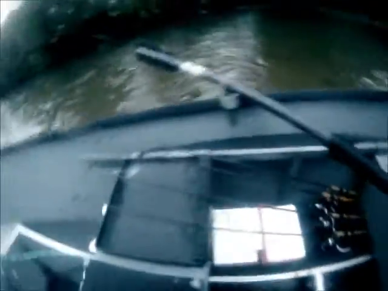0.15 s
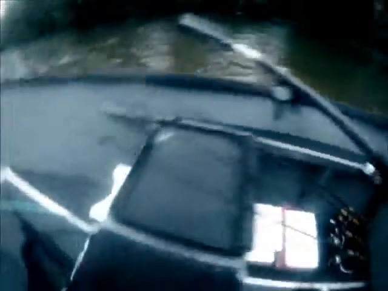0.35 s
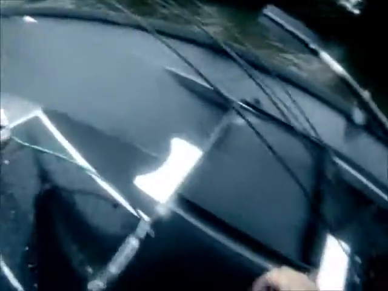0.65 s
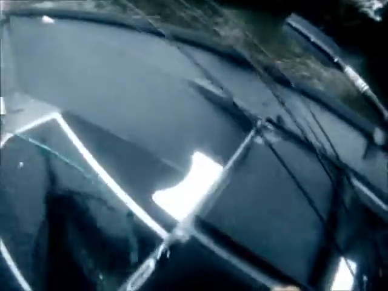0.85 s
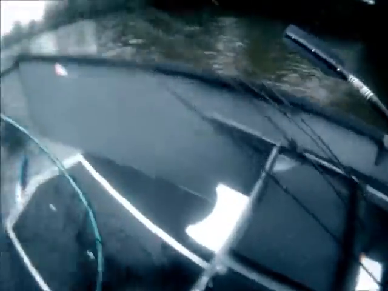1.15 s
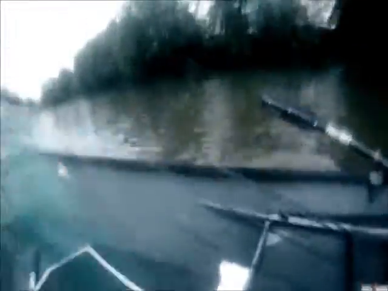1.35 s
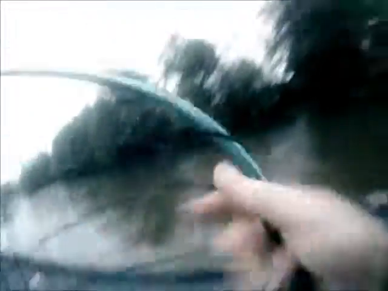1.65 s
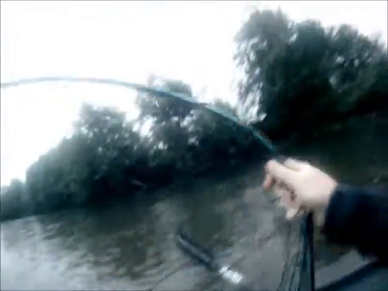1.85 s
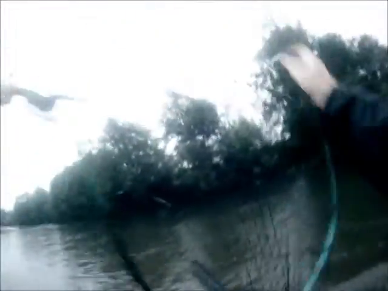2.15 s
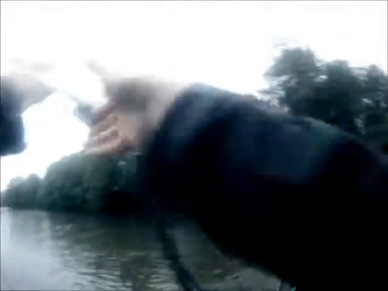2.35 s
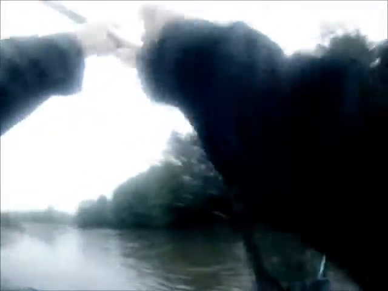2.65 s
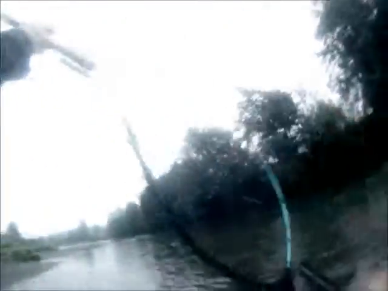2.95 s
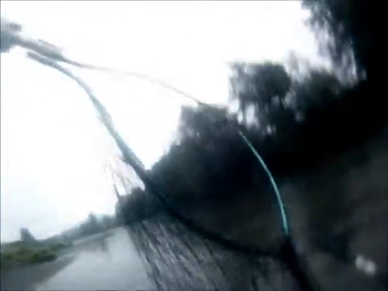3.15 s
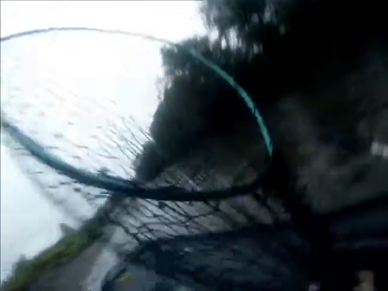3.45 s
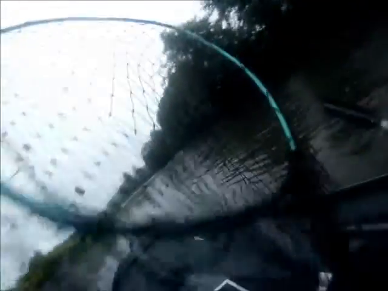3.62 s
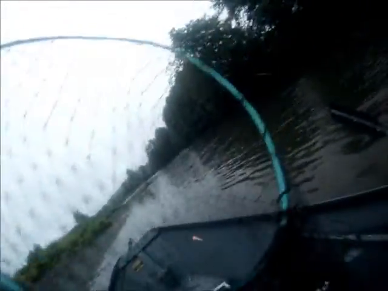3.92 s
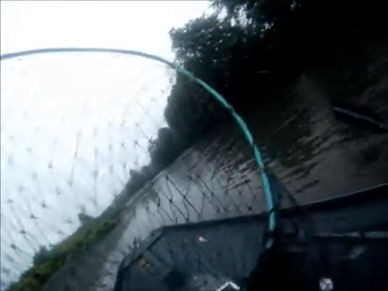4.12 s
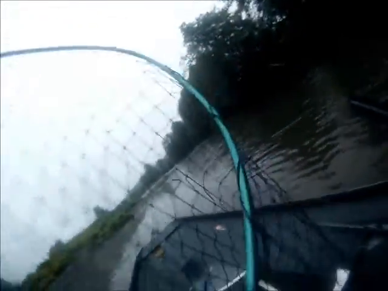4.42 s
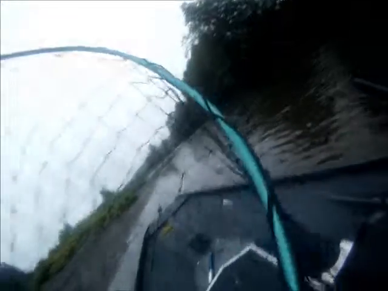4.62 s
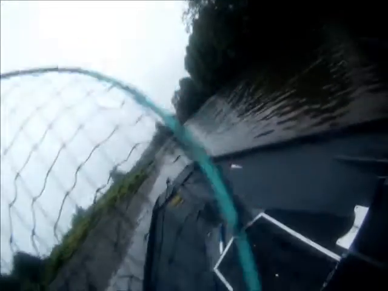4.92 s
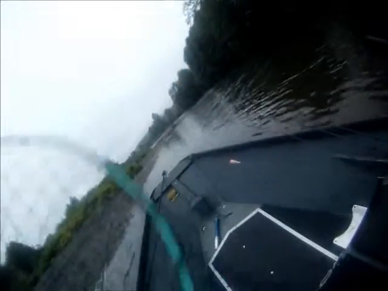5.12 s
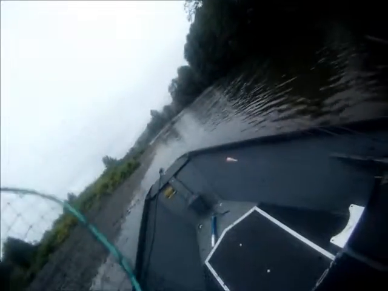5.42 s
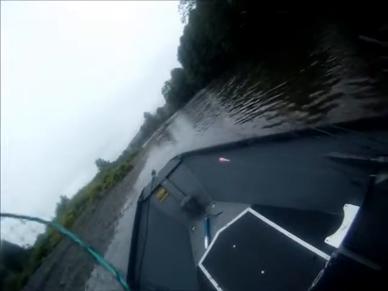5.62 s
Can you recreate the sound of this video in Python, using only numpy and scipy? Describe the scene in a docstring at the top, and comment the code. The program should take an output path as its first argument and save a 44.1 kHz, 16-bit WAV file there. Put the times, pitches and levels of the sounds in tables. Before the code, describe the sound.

Jacket cloth rubs against a body-worn microphone on a small river boat, with one hard knock, net ticks and quiet lapping water.

```python
"""On a small boat drifting down a river, microphone inside the case of a body-worn camera.
From the start water washes along the hull and a jacket rubs over the case in uneven swells.
Near 1 s a wavelet breaks and a landing net is lifted, gear ticking; at 1.5 s a hard knock overloads
the microphone. After 3 s the rubbing eases, a few plops follow, and near the end a bird calls far off.
Throughout, the recorder holds each sample at a low rate, mirroring the sound into a thin treble sheen."""
import sys
import numpy as np
from scipy import signal
from scipy.fft import rfft, irfft
from scipy.io import wavfile

SR = 44100
rng = np.random.default_rng(int(sys.argv[2]) if len(sys.argv) > 2 else 0)


def store_wav(level_fs):
    """Save 16-bit WAV to argv[1]."""
    pcm = np.round(np.clip(np.atleast_2d(level_fs), -1, 1) * 32767)
    wavfile.write(sys.argv[1], SR, pcm.T.astype(np.int16))


N = 254898
TIME = np.arange(N) / SR


def jacket_rub(rustle_db=4.5, ring_db=-4.5, rumble_db=-0.5, flutter_db=1.4, catch_db=2.5, jostle_db=2.15):
    """Cloth sticks and slips right at the microphone: it rustles, rings the case and jostles it."""
    # Spectrum of the sliding cloth. Each row: frequency in Hz, relative level in dB.
    rustle_spectrum = [(220, -45), (380, -20), (456, -25), (635, -11), (844, -17), (957, -9.5), (1120, -6),
                       (1650, -14.5), (1940, -3), (2200, -7.5), (2960, -15.5), (3430, -11.5), (4070, -28),
                       (4720, -29), (5800, -30), (7540, -60.5), (12800, -120)]
    # Spectrum of the case being pushed about. Each row: frequency in Hz, relative level in dB.
    rumble_spectrum = [(12, -32), (20, -1), (49, -6), (113, 1.5), (161, -8), (271, -7.5), (325, -18.5),
                       (405, -29), (450, -27.5), (580, -59.5), (990, -120)]
    rustle_gain, ring_gain, rumble_gain = jacket_strokes()
    pressure_db = flutter_db * drift(35)
    slips = rng.standard_normal(N) * from_db(-0.5 * drift(400))  # fine grain
    rustle = colour(slips, rustle_spectrum)
    shell = rms_one(band(rng.standard_normal(N), 1843, 2281, order=3))
    # the shell sings in short spurts whenever the cloth catches
    spurts = rms_one(from_db(pressure_db + catch_db * drift(25)))
    rumble = colour(rng.standard_normal(N), rumble_spectrum)
    jostle = rms_one(from_db(jostle_db * drift(14)))
    return (from_db(rustle_db + pressure_db) * rustle_gain * rustle
            + from_db(ring_db) * ring_gain * shell * spurts
            + from_db(rumble_db + pressure_db) * rumble_gain * rumble * jostle)


def jacket_strokes(drop_db=9, roundness=1.38):
    """Gains of rustle, ring and rumble: each stroke swells and dies away, and overlaps add in power."""
    # Strokes over the case. Each row: crest in seconds, relative level in dB, rise and fall in seconds
    # (each spans drop_db), offsets of the ring and of the rumble in dB.
    strokes = [(0.012, -51, 0.016, 0.041, -11, 0), (0.225, -47.5, .11, 0.056, -11, 0),
               (0.365, -52, 0.02, 0.033, -12, -11), (0.48, -46.5, 0.099, 0.27, 8, 7),
               (0.661, -43.5, 0.054, 0.057, 8, 6), (0.798, -47.5, 0.059, 0.051, 3, 4),
               (0.931, -43, 0.021, 0.028, 6, 6), (1.046, -48, 0.26, 0.051, -1, 9.5),
               (1.18, -46.5, 0.11, 0.029, 7, 7), (1.445, -43, .2, 0.029, 9, 3.5),
               (1.652, -44, 0.054, 0.043, 5.5, 1.5), (1.876, -42, 0.092, 0.024, 6, 0.5),
               (2.1, -48.5, 0.29, 0.37, 7.5, 2), (2.225, -40, 0.034, 0.022, 12.5, -1),
               (2.526, -34, 0.053, 0.07, 9.5, -2), (2.66, -46, 0.27, 0.12, 8.5, 3.5),
               (2.886, -40, 0.061, .03, 9, 9), (2.964, -32, 0.072, 0.044, 5, 0),
               (3.023, -38.5, 0.044, 0.0065, 12, 4), (3.075, -48, 0.029, 0.16, 11, 2.5),
               (3.279, -46, 0.021, 0.017, 9, -4.5), (3.41, -55.5, 0.085, 0.037, 17, 6.5),
               (3.546, -50.5, .1, 0.11, 10, 8), (3.812, -55.5, 0.085, 0.11, 3, -2),
               (4.04, -53.5, 0.044, 0.044, 9.5, -7.5), (4.179, -54.5, 0.027, 0.022, 9, 4.5),
               (4.256, -53.5, 0.034, 0.027, 6.5, 3.5), (4.408, -54.5, 0.055, 0.062, 6, 1.5),
               (4.529, -55, 0.036, .072, 9, 4), (4.665, -54, 0.088, 0.019, 10, 0.5),
               (4.86, -57, 0.34, 0.029, 2, 6), (4.96, -56, 0.038, 0.045, 6.5, 7.5),
               (5.035, -54.5, 0.035, 0.065, 15.5, 6.5), (5.16, -61, 0.056, 0.19, 7.5, 4.5),
               (5.564, -55, 0.081, 0.12, 1.5, 1.5), (5.76, -59, 0.036, 0.031, 8, 0)]
    t, power = TIME[::40], 0
    for crest, db, rise_s, fall_s, ring_db, rumble_db in strokes:
        from_crest = np.abs((t - crest) / np.where(t < crest, rise_s, fall_s))
        level_db = db - drop_db * from_crest ** roundness  # roundness 1 is pointed, 2 a bell
        power = power + from_db(level_db + np.array([[0], [ring_db], [rumble_db]])) ** 2
    return [np.interp(TIME, t, np.sqrt(layer)) for layer in power]


def knock(start=1.468, contact_s=0.0015, judder_s=0.0083, stop_s=0.00065, crack_db=-20, hull_db=-41):
    """A hard hit on the case: a shove, a judder cut off as contact ends, a crack, a faint hull note."""
    # Flexing of the case and its mount. Each row: frequency in Hz, gain in dB, t60 in seconds.
    flex_modes = [(125, 4, .025), (282, 16.7, .0101), (497, 19.8, .0125), (719, 12.8, .0099),
                  (1140, 13.9, .0225), (1970, 9.1, .064), (2220, 6.7, .078)]
    # Modes of the hull. Each row: frequency in Hz, relative gain in dB, t60 in seconds.
    hull_modes = [(534, -4, 0.3), (730, -7, 0.18), (1082, -20.5, 0.26)]
    t = TIME[:SR // 2]
    blow = signal.unit_impulse(len(t))
    shove = np.minimum(t / contact_s, 1) ** 2
    release = 1 / (1 + np.exp(np.minimum((t - judder_s) / stop_s, 50)))
    crack = peak_one(band(burst(t60=0.035), 900, 4000))
    out = np.zeros(N)
    add(out, start, shove * release * ring(blow, flex_modes))
    add(out, start + judder_s, from_db(crack_db) * crack)
    add(out, start, from_db(hull_db) * ring(blow, hull_modes))
    return out


def case_taps(gain_db=1.5):
    """Light taps ring the plastic case around the microphone."""
    # Taps on the case. Each row: start in seconds, peak in dB before gain_db.
    taps = [(0.3576, -37), (1.0134, -26), (3.0627, -43), (3.4757, -32.5), (3.6987, -30), (3.7954, -35),
            (3.8268, -37), (3.903, -40), (4.1792, -31), (5.021, -28.5)]
    # Modes of the case. Each row: frequency in Hz, relative gain in dB, t60 in seconds.
    case_modes = [(640, -12, 0.043), (1220, -37, 0.012), (1960, 21, 0.028), (2340, 21, 0.012),
                  (2500, -9, 0.02), (3510, -4, 0.03)]
    out = np.zeros(N)
    for start, db in taps:
        tap = peak_one(ring(burst(t60=0.0066), case_modes))
        add(out, start, from_db(db + gain_db) * tap)
    return out


def net_ticks(gain_db=1, lifting_s=(1, 4.2), faint_count=16, faint_db=(-53, -45), faint_t60=0.045):
    """Net and gear tick brightly close by; fainter ticks come at random while the net is lifted."""
    # The distinct ticks. Each row: start in seconds, peak in dB before gain_db, t60 in seconds.
    ticks = [(0.8011, -37.5, 0.033), (0.8919, -37, 0.16), (0.9133, -30, 0.18), (1.1897, -41, .08),
             (1.6801, -39, 0.21), (1.7659, -30, 0.04), (2.1316, -37, 0.043), (2.3441, -33.5, 0.1),
             (2.7077, -33.5, 0.018), (2.8769, -38, 0.068), (3.0659, -36.5, 0.056), (3.1946, -43.5, 0.073),
             (3.4186, -37, 0.032), (3.8272, -38, 0.045)]
    faint = [(rng.uniform(*lifting_s), rng.uniform(*faint_db), faint_t60) for _ in range(faint_count)]
    out = np.zeros(N)
    for start, db, t60 in [*ticks, *faint]:
        tick = peak_one(band(burst(t60), 1830, 5000, order=3))
        add(out, start, from_db(db + gain_db) * tick)
    return out


def gear_bumps(gain_db=-2):
    """Gear bumps close by, each thud one low, dying sine."""
    # Dull bumps. Each row: start in seconds, level in dB before gain_db, pitch in Hz.
    bumps = [(0.471, -26, 109), (0.914, -29, 171), (1.047, -34, 227), (2.272, -30.5, 61),
             (3.029, -29.5, 50), (3.687, -37, 92.8), (4.721, -34.5, 89)]
    out, decay = np.zeros(N), fade(t60=0.16)
    for start, db, hz in bumps:
        thud = decay * np.sin(2 * np.pi * hz * TIME[:len(decay)])
        add(out, start, from_db(db + gain_db) * thud)
    return out


def squeaks():
    """Wet cloth and rubber give short, high squeaks near the microphone."""
    # Squeaks. Each row: start and length in seconds, first and target pitch in Hz, level in dB.
    notes = [(.892, 0.021, 3340, 3060, -38), (.913, 0.018, 3560, 3650, -35),
             (1.012, 0.0054, 3590, 3330, -28.5), (1.0125, 0.015, 2210, 2090, -23),
             (1.019, 0.018, 2090, 2000, -35), (1.19, 0.023, 3760, 3720, -47)]
    return glides(notes, settle_s=0.0081, waver=0.0065)


def splashes(gain_db=-3, spray_db=-4, rise_s=0.0068):
    """Wavelets swell against the side of the boat, slap and break into longer-lasting spray."""
    # Wavelets. Each row: start in seconds, peak in dB before gain_db, t60 of the slap in seconds.
    wavelets = [(0.917, -32.5, 0.085), (0.936, -32.5, 0.075), (4.039, -48, 0.3), (4.843, -35.5, 0.07)]
    out = np.zeros(N)
    for start, db, t60 in wavelets:
        slap = peak_one(band(burst(t60), 230, 490))
        spray = peak_one(band(burst(t60 * 3.1), 1300, 4000))
        swell = 1 - np.exp(-TIME[:len(slap)] / rise_s)
        splash = peak_one(swell * (slap + from_db(spray_db) * spray))
        add(out, start, from_db(db + gain_db) * splash)
    return out


def plops():
    """Water plops beside the hull in short, rising tones."""
    # Plops. Each row: start and length in seconds, first and target pitch in Hz, level in dB.
    notes = [(.358, .025, 1135, 1215, -39), (.925, 0.095, 330, 382, -49.5), (4.797, 0.018, 556, 640, -52),
             (4.798, 0.014, 860, 970, -52), (4.836, 0.016, 360, 448, -50), (4.87, 0.035, 191, 225, -46.5),
             (5.201, 0.0056, 630, 825, -47), (5.25, 0.055, 1250, 1280, -52)]
    return glides(notes, settle_s=0.018, waver=0.049)


def river(level_db=-58.5, lap_db=3.2):
    """The current washes along the hull, a quiet, lapping bed under everything."""
    # Spectrum of the wash. Each row: frequency in Hz, relative level in dB.
    wash_spectrum = [(18, -28.5), (30, -2.5), (128, -10.5), (296, -21), (471, -21.5), (574, -25),
                     (781, -21.5), (853, -32.5), (996, -18), (1650, -31), (2250, -15.5), (2570, -30.5),
                     (3490, -29.5), (4970, -28.5), (5800, -37), (7540, -74), (12800, -120)]
    lapping = from_db(level_db + lap_db * drift(5.5))
    return lapping * colour(rng.standard_normal(N), wash_spectrum)


def far_bird():
    """A bird far from the boat gives three faint, falling notes."""
    # The call. Each row: start and length in seconds, first and target pitch in Hz, level in dB.
    notes = [(5.33, 0.0092, 4820, 4300, -62.5), (5.343, 0.041, 4120, 3840, -58),
             (5.473, 0.039, 3950, 3840, -59)]
    return glides(notes, settle_s=0.012, waver=0.01)


def glides(notes, settle_s, waver):
    """Short, slightly unsteady tones that slide towards a target pitch."""
    out, wobble = np.zeros(N), drift(250)
    for start, length, first_hz, target_hz, db in notes:
        t = TIME[:int(length * SR)]
        hz = target_hz + (first_hz - target_hz) * np.exp(-t / settle_s)
        hz *= 1 + waver * wobble[int(start * SR):][:len(t)]
        arch = np.sin(np.pi * t / length)
        add(out, start, from_db(db) * arch * np.sin(2 * np.pi * np.cumsum(hz) / SR))
    return out


def from_db(db):
    """Decibels to gain."""
    return 10 ** (np.asarray(db) / 20)


def rms_one(x):
    """Scale to rms 1."""
    return x / np.sqrt(np.mean(x ** 2) + 1e-20)


def peak_one(x):
    """Scale to peak 1."""
    return x / (np.abs(x).max() + 1e-12)


def band(x, low_hz, high_hz, order=2):
    """Causal band-pass."""
    sos = signal.butter(order, [low_hz, min(high_hz, .45 * SR)], "band", fs=SR, output="sos")
    return signal.sosfilt(sos, x + 1e-18)


def colour(x, spectrum):
    """Shape x with a spectrum drawn on a log-frequency axis; rms 1."""
    hz, db = np.transpose(spectrum)
    bins = np.maximum(np.fft.rfftfreq(N, 1 / SR), 1)
    gain = from_db(np.interp(np.log(bins), np.log(np.sort(hz)), db))
    return rms_one(irfft(rfft(x) * gain, N))


def drift(rate_hz):
    """Random wander, mostly slower than rate_hz; rms 1."""
    bins = np.fft.rfftfreq(N, 1 / SR)
    return rms_one(irfft(rfft(rng.standard_normal(N)) / (1 + (bins / rate_hz) ** 2), N))


def ring(x, modes):
    """Drive parallel resonators with x; each rings as a damped sine."""
    out = 0
    for hz, db, t60 in modes:
        radius, angle = from_db(-60 / (t60 * SR)), 2 * np.pi * hz / SR
        feedback = [1, -2 * radius * np.cos(angle), radius * radius]
        out = out + from_db(db) * signal.lfilter([0, np.sin(angle)], feedback, x + 1e-18)
    return out


def fade(t60):
    """A third of a second of exponential decay, falling 60 dB in t60 seconds."""
    return np.exp(-np.log(1000) * TIME[:SR // 3] / max(t60, 1e-4))


def burst(t60):
    """A dying spray of tiny contacts."""
    decay = fade(t60)
    return decay * rng.standard_normal(len(decay))


def add(out, start, sound):
    """Mix a sound in at start seconds."""
    at = int(start * SR)
    out[at:at + len(sound)] += sound[:N - at]


def scene():
    """Water around the boat, handling at the microphone and a bird in the distance, in mono."""
    water = river() + splashes() + plops()
    handling = jacket_rub() + case_taps() + net_ticks() + gear_bumps() + knock() + squeaks()
    return (water + handling + far_bird())[None]


def record(dry, hold_hz=12000, cutoff_hz=15550):
    """A slow converter overloads at full scale and holds each sample, mirroring sound about its rate."""
    slow = np.clip(signal.resample_poly(dry, hold_hz, SR, axis=1), -1, 1)
    steps = np.repeat(slow, 8, axis=1)
    held = signal.resample_poly(steps, SR, 8 * hold_hz, axis=1)[:, :N]
    treble_cut = signal.firwin(201, cutoff_hz, fs=SR)
    return signal.fftconvolve(held, treble_cut[None], mode="same")


dry = scene()
out = record(dry)
store_wav(out)
```